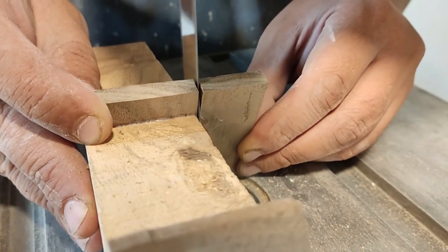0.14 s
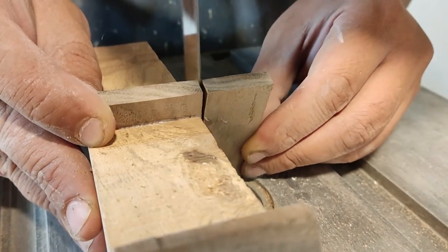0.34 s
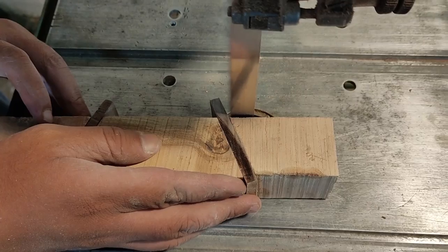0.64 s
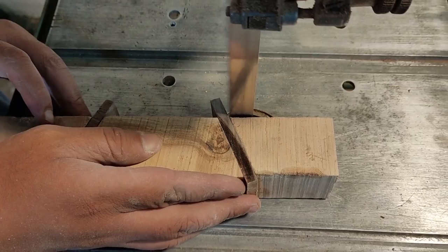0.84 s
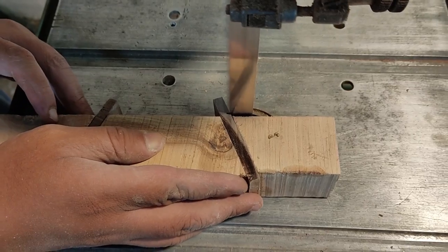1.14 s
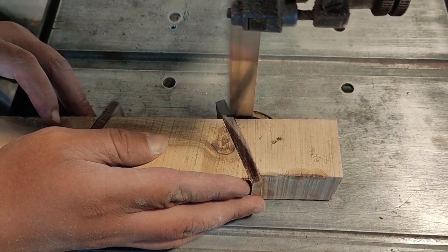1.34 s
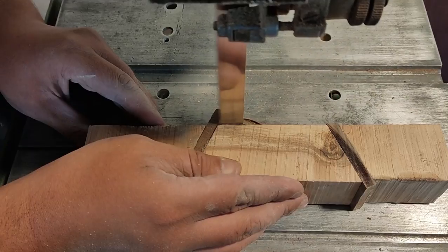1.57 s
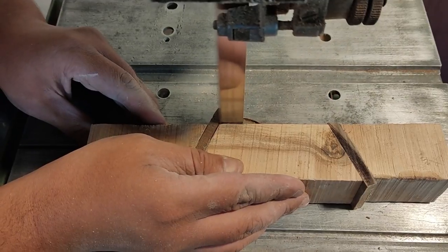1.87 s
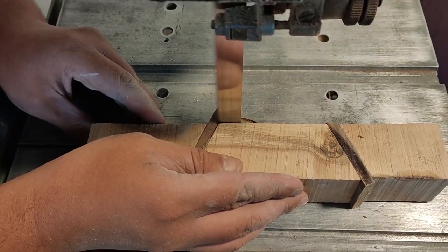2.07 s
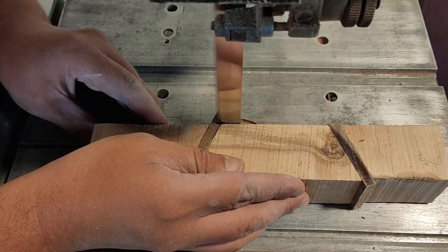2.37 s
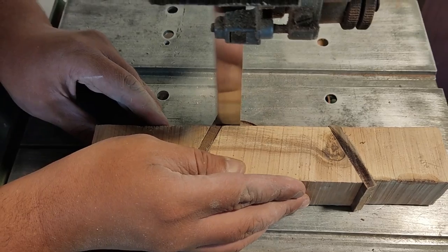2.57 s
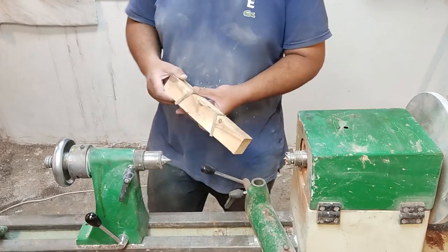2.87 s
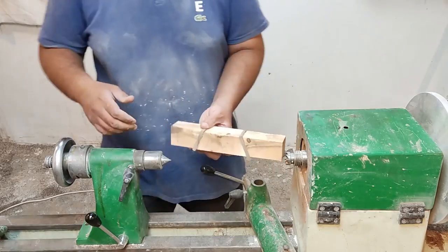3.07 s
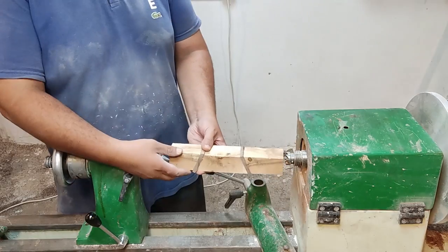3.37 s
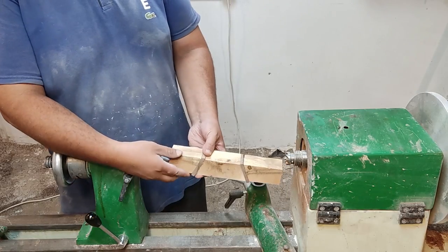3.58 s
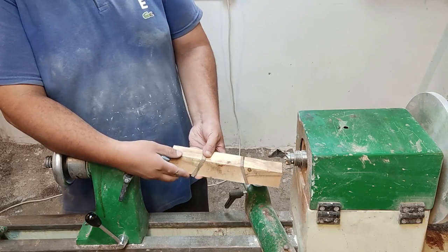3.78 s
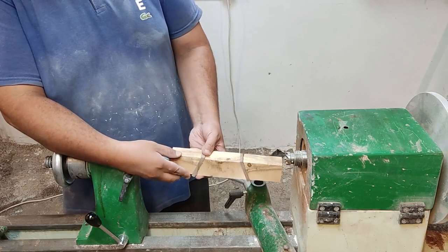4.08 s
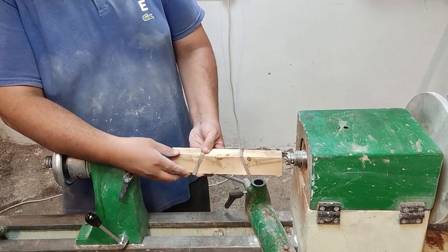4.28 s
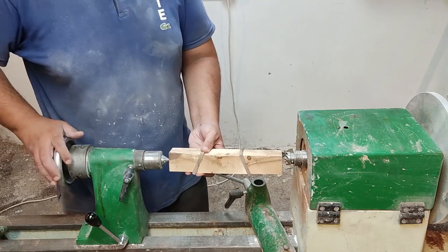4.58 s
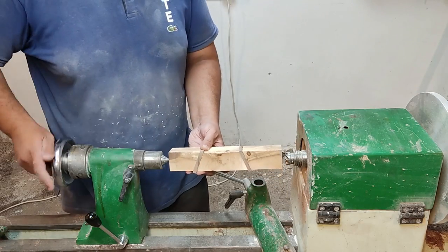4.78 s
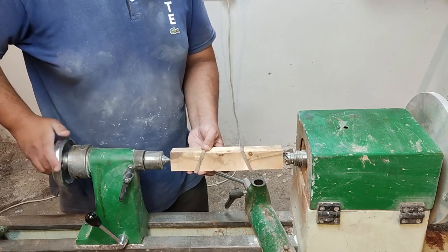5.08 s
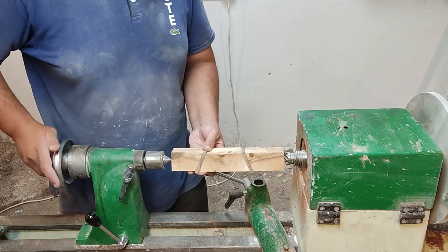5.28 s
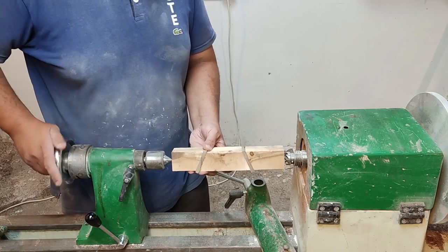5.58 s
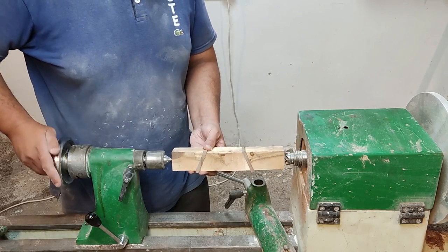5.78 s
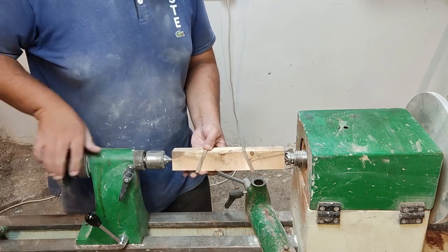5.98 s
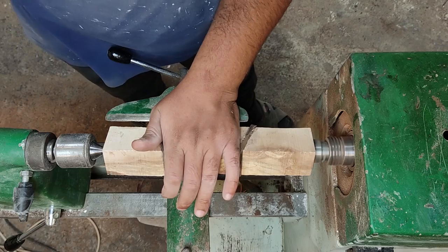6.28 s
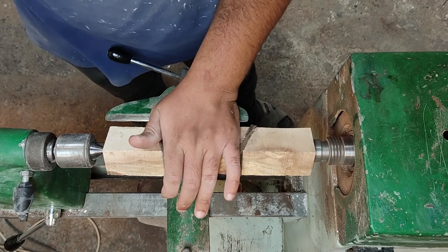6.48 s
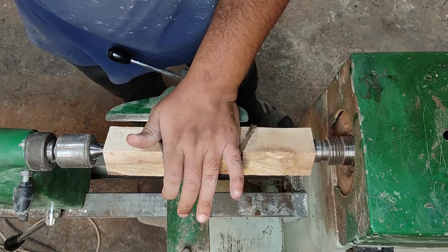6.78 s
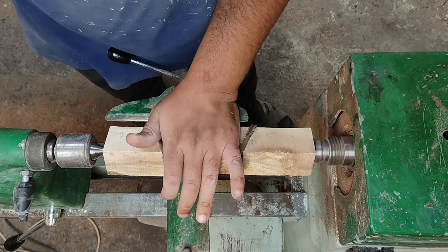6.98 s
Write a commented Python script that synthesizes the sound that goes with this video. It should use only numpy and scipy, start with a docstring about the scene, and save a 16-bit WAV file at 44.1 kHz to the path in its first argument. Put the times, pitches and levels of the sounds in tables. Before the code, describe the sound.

Harsh buzzing band saw cutting wood in three views, a sudden drop to low machine drone and handling knocks, finally a rumbling wood lathe.

```python
"""A band saw bites through wood, heard from three views in turn: a rough stack of tooth tones over motor hum.
Then comes a quiet shop with droning machines and hiss, where a hand brushes and knocks a wooden block.
Last a lathe runs close by, its bearings and belt droning while the cut swells twice.
Periodic forces are sums of wavering sines, friction is coloured noise, and struck bodies are resonators
driven by short bursts; sum and difference signals spread each source over two microphones."""
import sys
import numpy as np
from scipy import signal
from scipy.fft import rfft, irfft, next_fast_len
from scipy.io import wavfile
from scipy.ndimage import uniform_filter1d, map_coordinates

SR = 44100
rng = np.random.default_rng(int(sys.argv[2]) if len(sys.argv) > 2 else 0)


def store_pcm(level_fs):
    """Save levels as 16-bit WAV."""
    pcm = np.round(np.clip(level_fs, -1, 1) * 32767).astype(np.int16)
    wavfile.write(sys.argv[1], SR, np.atleast_2d(pcm).T)


N = 314433  # samples

# starts of the second saw view, third saw view, quiet shop and lathe: (time [s])
STARTS = [.647, 1.6, 2.679, 6.1598]
# saw layers: name: (level in view 1 [dB], in view 2 [dB], in view 3 [dB], response to the feed [dB per dB])
SAW_LAYERS = {"second order": (-62, -61, -61.5, 0.4), "third order": (-49, -64, -64.5, 1.3),
              "fourth order": (-68.5, -64, -58, .5), "frame": (-62, -54.5, -59.5, 0.26),
              "blade": (-65, -60.5, -61, -0.2), "sizzle": (-46, -63, -68, 1.3),
              "sawdust": (-46.5, -48, -47.5, 0.74), "ring": (-77, -69, -65.5, .5)}
# pressure of the wood on the blade: (time [s], level [dB])
FEED_PRESSURE = [(0, -1.5), (.14, 0.5), (.22, -3.5), (.31, -6), (.45, -1.5), (.62, -1), (.7, -1.5),
                 (1.0, -0.5), (1.55, 1.5), (1.95, 2), (2.4, -1), (2.62, 0)]


def amp(db):
    """Level to amplitude: 20 dB is a factor of ten."""
    return 10 ** (np.asarray(db) / 20)


def unit(x):
    """Normalization to an rms of 1, so that a later gain alone sets the level."""
    return x / np.sqrt(np.mean(x ** 2) + 1e-20)


def along(points, hz):
    """Interpolation of (frequency, value) points on a logarithmic frequency axis."""
    f, v = np.transpose(points)
    return np.interp(np.log(hz + 1), np.log(f + 1), v)


def curves(rows):
    """Linear interpolation in time: one curve for each column after the time."""
    s, *columns = np.transpose(rows)
    return [np.interp(np.arange(N) / SR, s, column) for column in columns]


def wobble(rate):
    """Slow random modulation: straight lines between normal random knots, rate of them a second."""
    knots = rng.standard_normal(int(N * rate / SR) + 4)
    return map_coordinates(knots, [np.arange(N) * rate / SR], order=1)


def bump(s, half):
    """Gaussian time window of height 1 around s, down to 1/e at half seconds away."""
    return np.exp(-((np.arange(N) / SR - s) / half) ** 2)


def between(start, end):
    """Time gate: 1 from start to end, with a linear 2 ms ramp across each edge."""
    t = np.arange(N) / SR
    return np.clip(np.minimum(t - start, end - t) * 500 + .5, 0, 1)


def by_view(values):
    """Stepwise setting: one value for each saw view, the last held to the end."""
    return np.asarray(values)[np.searchsorted(STARTS[:2], np.arange(N) / SR)]


def filtered(x, response):
    """Linear filtering: the spectrum is multiplied by a complex response of frequency."""
    m = next_fast_len(N + 8192)  # padding keeps tails from wrapping round
    return irfft(rfft(x, m) * response(np.fft.rfftfreq(m, 1 / SR)), m)[..., :N]


def ringing(modes):
    """Modal superposition: damped resonators (centre Hz, width Hz, dB) add with alternating sign."""
    def response(f):
        total = 0
        for k, (centre, width, db) in enumerate(modes):
            damping = 1j * f * width
            total = total + (-1) ** k * amp(db) * damping / (centre * centre - f * f + damping)
        return total
    return response


def colour(spectrum):
    """Spectral shaping: a zero-phase response through (Hz, dB) points."""
    return lambda hz: amp(along(spectrum, hz))


def noise(response, patchy_db):
    """Broadband friction: two independent noises with shared random gain patches, filtered, joint rms 1."""
    z = signal.stft(rng.standard_normal((2, N)), nperseg=512)[2]
    field = rng.standard_normal(z.shape[1:])
    field = uniform_filter1d(field, size=5, axis=0)  # patches span neighbouring frequencies
    field = uniform_filter1d(field, size=8, axis=1)  # and neighbouring moments
    patchy = signal.istft(z * amp(patchy_db * unit(field)), nperseg=512)[1][:, :N]
    return unit(filtered(patchy, response))


def tone(phase):
    """Quadrature pair: a sine of rms 1 and its quarter-turned twin."""
    return np.sqrt(2) * np.array([np.sin(phase), np.cos(phase)])


def hum(lines, waver_db, drift, rate):
    """Rotating machinery as partials (Hz, dB) whose level and phase (drift, radians) wander."""
    turn = 2 * np.pi * np.arange(N) / SR
    total = 0
    for hz, db in lines:
        gain = amp(db + waver_db * wobble(rate))
        phase = hz * turn + drift * wobble(rate) + 2 * np.pi * rng.random()
        total = total + gain * tone(phase)
    return total


def stereo(pair, alike, lean, lag_s=0):
    """Interchannel coherence: sum and difference of the pair set likeness, then balance and delay."""
    def mix(hz):
        angle = np.arccos(np.clip(along(alike, hz), -.8, 1)) / 2
        return np.array([1 + 0 * hz, np.tan(angle)])

    half = np.array([[.5], [-.5]])  # left and right share the offset equally

    def offset(hz):
        return amp(along(lean, hz) * half) * np.exp(-2j * np.pi * hz * lag_s * half)

    mid, side = filtered(pair, mix)
    return filtered(np.array([mid + side, mid - side]), offset)


def strokes():
    """Sliding friction follows hand speed: rub and dust gains swell, peak roundly and fade."""
    # strokes over wood: (peak time [s], rise [s], fall [s], rub level [dB], dust level [dB])
    stroke_rows = [(2.8, 0.055, .06, -61.5, -61), (3.018, 0.06, 0.074, -52.5, -54.5),
                   (3.325, 0.17, .1, -61, -61.5)]
    span_db = 20  # level change over one rise or fall time
    t = np.arange(N) / SR
    total = 0
    for s, rise, fall, rub_db, dust_db in stroke_rows:
        distance = (t - s) / np.where(t < s, rise, fall)
        total = total + amp([[rub_db], [dust_db]] - span_db * distance ** 2)
    return total


def puff(s, db, t60):
    """Exponential decay: a noise burst from s that falls 60 dB in t60, cut off after 0.25 s."""
    out, t = np.zeros((2, N)), np.arange(SR // 4) / SR
    out[:, round(s * SR):][:, :len(t)] = amp(db - 60 * t / t60) * rng.standard_normal((2, len(t)))
    return out


def contacts():
    """Impact excitation: knocks ring the block's modes; metal ticks ring broad, bright resonances."""
    # modes of the wooden block: (frequency [Hz], width [Hz], relative level [dB])
    block = [(760, 110, -3.5), (1200, 140, -1), (1440, 89, 2.5), (2540, 700, -18)]
    # knocks: (time [s], excitation level before the block [dB], 60 dB decay time of the excitation [s])
    knock_rows = [(3.2148, -43.5, 0.04), (3.224, -42.5, 0.036), (3.230, -42, 0.036), (3.236, -41, .03),
                  (3.247, -45.5, .04), (3.253, -49, 0.12), (4.853, -60, .2), (5.81, -65, 0.15)]
    # ticks: (time [s], excitation level [dB], centre frequency [Hz], 60 dB decay time of the excitation [s])
    tick_rows = [(4.836, -55, 9000, .02), (4.843, -53.5, 15000, .06), (4.853, -55.5, 3000, 0.096),
                 (5.81, -57.5, 3000, 0.11)]
    blows = sum(puff(*row) for row in knock_rows)
    for s, db, _ in knock_rows:
        blows[:, round(s * SR)] += amp(db + 14.5)  # one firm push leads each knock
    total = filtered(blows, lambda hz: amp(10) * ringing(block)(hz))
    for s, db, hz, t60 in tick_rows:
        total = total + filtered(puff(s, db, t60), ringing([(hz, 0.38 * hz, 0)]))
    return total


def shop():
    """Diffuse background: distant machines drone under microphone hiss while a hand works the block."""
    # broadband drone: (frequency [Hz], relative density [dB per Hz])
    drone_colour = [(15, -30), (25, 2.5), (67, -8), (117, -15.5), (156, -3), (200, -7), (344, -5),
                    (556, -14), (636, -9.5), (728, -17.5), (802, -16), (2500, -33), (3250, -55),
                    (5500, -120)]
    # tones of the distant machines: (frequency [Hz], relative level [dB])
    drone_tones = [(64.6, -73.5), (172.3, -71), (279.9, -71), (339.1, -71), (371.4, -71.5), (500.6, -75.5),
                   (624.5, -79), (780.6, -82), (1050, -83), (2370, -90.5)]
    # microphone hiss: (frequency [Hz], relative density [dB per Hz])
    hiss_colour = [(710, -27), (1200, -6.5), (2360, -7.5), (3330, -7), (6220, -10.5), (9570, -15),
                   (13500, -13.5), (14900, -9), (15700, -10.5)]
    # skin rubbing over wood: (frequency [Hz], relative density [dB per Hz])
    skin = [(410, -41), (700, -7), (762, -6), (1730, -9), (3200, -4.5), (4590, -7.5), (5250, -7),
            (6520, -10), (12500, -12), (16200, -41), (22000, -120)]
    # likeness of the two microphones: (frequency [Hz], left-right correlation [-1 to 1])
    shop_alike = [(60, 0.81), (150, 0.99), (380, 0.96), (950, 0.7), (2380, 0.36), (5980, 0.21),
                  (15000, 0.18)]
    drone_db, hiss_db = -60.5, -69
    left_lag_s = .00014  # the left microphone hears the shop this much later

    rub, fine = strokes()
    drone_noise = amp(-0.5) * noise(colour(drone_colour), patchy_db=0.5)
    drone = drone_noise + amp(-5) * unit(hum(drone_tones, waver_db=3.0, drift=0.95, rate=12))
    hiss = amp(hiss_db) * noise(colour(hiss_colour), patchy_db=1.0)
    dust = ringing([(14900, 3000, 0)])
    brush = rub * noise(colour(skin), patchy_db=2.0)
    brush = brush + fine * noise(lambda hz: dust(hz) ** 2, patchy_db=4.0)
    swell = amp(drone_db + .6 * wobble(3))
    room = stereo(swell * drone + hiss, shop_alike, [(500, 0.069)], left_lag_s)
    hand_alike = [(640, 0.67), (1400, .2), (12000, .05)]
    hand_lean = [(4400, -0.5), (9000, -0.5), (15000, -8.5)]
    return room + stereo(brush + contacts(), hand_alike, hand_lean)


def lathe():
    """Forced vibration: spindle tones and bed rumble, while the cut drives tones near 800 Hz and shavings."""
    # level of the cut: (time [s], level [dB])
    press = [(6.16, -38), (6.29, -42.5), (6.35, -47), (6.47, -50.5), (6.52, -41), (6.66, -36), (6.8, -39),
             (6.97, -49.5), (7.13, -42.5)]
    # headstock tones: (frequency [Hz], relative level [dB])
    headstock = [(155, -56.5), (170, -56.5), (195, -57.5), (322, -58), (340, -55), (364, -54), (379, -52),
                 (418, -55.5), (456, -56.5), (475, -58.5), (499.4, -53.5)]
    # tones driven by the cut: (frequency [Hz], relative level [dB])
    chatter = [(637, -52), (714.6, -52), (753, -47.5), (790.5, -47.5), (819.5, -41), (924.6, -51.5),
               (1039, -55.5), (1075, -67), (1110, -63), (1172, -79)]
    # bearing tones: (frequency [Hz], relative level [dB])
    bearing_tones = [(1292, -62), (1448, -62), (1658, -61), (1841, -63), (1992, -62), (2024, -62),
                     (2089, -64), (2126, -62), (2169, -62), (2207, -62), (2261, -67), (2353, -58),
                     (2552, -68), (2719, -72)]
    # rumble of the bed: (frequency [Hz], relative density [dB per Hz])
    bed_colour = [(12, -46), (20, -10), (102, -9.5), (173, -4), (248, -8.5), (368, 0.5), (492, -7),
                  (555, -13), (795, 3), (882, -13), (1060, -2.5), (1200, -18), (1560, -46), (2640, -120)]
    # noise of the shavings: (frequency [Hz], relative density [dB per Hz])
    shavings_colour = [(530, -24), (900, -1), (1360, -13.5), (1430, -6.5), (1740, -9), (2270, -9.5),
                       (3320, -21.5), (3900, -16.5), (4910, -24), (6480, -23), (7530, -28), (8640, -22),
                       (9590, -27.5), (11000, -22.5), (14200, -42)]
    # likeness of the two microphones: (frequency [Hz], left-right correlation [-1 to 1])
    lathe_alike = [(60, 0.76), (120, 1), (240, 0.89), (480, 0.58), (950, 0.097), (1890, 0.05), (3770, 0.11),
                   (7520, -0.029), (15000, -0.04)]
    # balance: (frequency [Hz], left minus right [dB])
    lathe_lean = [(60, -.5), (240, -0.5), (520, -1), (640, -1), (820, 5), (1100, -0.5), (1890, -1),
                  (3770, .1), (7520, -3.5), (14000, 13)]
    head_db, bed_db, scrape_db, whine_db = -46, -46, -45.5, -64.5
    bed_grows, scrape_grows, whine_grows = 0.24, .2, .15  # dB per dB of the cut
    whine_hz, top_hz = 4000, 14250

    cut_db, = curves(press)
    swing_db = cut_db - np.mean(press, axis=0)[1]
    head = amp(head_db) * unit(hum(headstock, waver_db=1.5, drift=0.43, rate=7))
    cut = amp(cut_db) * unit(hum(chatter, waver_db=1.2, drift=.25, rate=8))
    bed = amp(bed_db + bed_grows * swing_db) * noise(colour(bed_colour), patchy_db=0.0)
    bearing = amp(-4.0) * unit(hum(bearing_tones, waver_db=5, drift=1.14, rate=16))
    shavings = amp(0.69 * wobble(60)) * noise(colour(shavings_colour), patchy_db=1.5)
    turn = 2 * np.pi * whine_hz * np.arange(N) / SR
    whine_gain = amp(whine_db + whine_grows * swing_db + 4.1 * wobble(30))
    whine = whine_gain * tone(turn + 0.83 * wobble(50))  # a thin wavering note
    scrape = amp(scrape_db + scrape_grows * swing_db) * (bearing + shavings)
    both = stereo(whine + head + cut + bed + scrape, lathe_alike, lathe_lean)
    return filtered(both, lambda hz: hz < top_hz)


def saw_level(layer):
    """Additive gains in dB: a layer's level in each view, its response to the feed and its flares."""
    # moments when one layer sings out: (layer name, time [s], half length [s], rise [dB])
    flare_rows = [("second order", .14, .08, 7.6), ("second order", .62, 0.035, 8.7),
                  ("second order", 0.77, 0.04, 5), ("second order", 1.09, 0.11, 6.5),
                  ("second order", 1.42, 0.064, 8.6), ("second order", 1.535, 0.032, 16.6),
                  ("second order", 2.09, 0.1, 6.3), ("second order", 2.54, .05, 6.9),
                  ("third order", .51, 0.066, 6), ("third order", 0.8, 0.06, 6.8),
                  ("third order", 1.326, 0.12, 7), ("third order", 1.55, .05, 6.8),
                  ("third order", 1.66, 0.02, 10), ("third order", 2.54, .1, 4.8),
                  ("fourth order", 0.16, .07, 12.6), ("fourth order", 1.546, 0.081, 10.4),
                  ("frame", 0.314, 0.062, 9.2), ("frame", 0.72, 0.057, 4.7), ("frame", 1.48, 0.029, 5.4),
                  ("frame", 2.67, 0.016, 10.5), ("blade", 0.9, 0.1, 4.2), ("blade", 1.4, 0.027, 4.7),
                  ("blade", 2.25, 0.2, 3.2), ("sizzle", 1.25, .1, 6), ("sizzle", 1.55, .08, 4)]
    *view_db, follows = SAW_LAYERS[layer]
    flares = sum(db * bump(s, half) for name, s, half, db in flare_rows if name == layer)
    return by_view(view_db) + follows * curves(FEED_PRESSURE)[0] + flares


def saw_beat():
    """Periodic modulation: the turning wheel shakes the blade most at twice its turning rate."""
    wheel_hz = 16.2  # mean rate
    wheel = 2 * np.pi * np.cumsum(wheel_hz + .3 * wobble(4)) / SR
    return np.sin(2 * wheel) + 0.33 * np.sin(wheel + 0.15) + 0.28 * np.sin(3 * wheel + 1.0)


def saw_teeth(db, beat):
    """Harmonic series: passing teeth give multiples of their rate; uneven set blurs high orders most."""
    # mean passing rate in each saw view: (rate [teeth per second])
    tooth_rate = [1040, 1038, 1037.8]
    # depth of the wheel's pulse on the tooth tones in each saw view: (depth [dB])
    pulse_depth = [3.5, 3, 2.5]
    # orders with the same base level in every view: (multiple of the tooth rate, level before the feed [dB])
    steady_orders = [(1, -65), (5, -68), (7, -65.5), (8, -69.5), (10, -70), (11, -72)]
    phase = 2 * np.pi * np.cumsum(by_view(tooth_rate)) / SR + .12 * beat
    phase = phase + .17 * wobble(200) + .03 * wobble(900) + .2 * wobble(30)  # late and early teeth
    pulse_db = by_view(pulse_depth) * beat

    def order(k):
        return amp(pulse_db + 2.5 * wobble(70)) * tone(k * phase + .4 * wobble(110))

    teeth = amp(db["second order"]) * order(2)
    teeth += amp(db["third order"]) * order(3)
    teeth += amp(db["fourth order"]) * order(4)
    teeth += amp(0.54 * db["third order"] - 35) * order(6)  # the squeal drags its octave along
    steady = sum(amp(level) * order(k) for k, level in steady_orders)
    return teeth + amp(1.3 * curves(FEED_PRESSURE)[0]) * steady


def saw_body(db, beat):
    """Resonance and modulation: noise rings the frame and blade; a blade tone pulses with the wheel."""
    # resonances of the frame: (frequency [Hz], width [Hz], relative level [dB])
    frame_modes = [(845, 80, 2), (1010, 116, -3), (1184, 153, -3), (2514, 220, -4.5), (2670, 190, -6),
                   (3035, 81, 3), (3760, 470, -11.5), (4156, 80, -5)]
    # lower wheel-rate sideband of the blade tone, then the tone: (frequency [Hz], relative level [dB])
    blade_lines = [(1737, -5.5), (1768, -4.5)]
    # high narrow ring of the blade: (frequency [Hz], width [Hz], relative level [dB])
    high_ring = [(12400, 100, 0)]
    frame = amp(db["frame"]) * noise(ringing(frame_modes), patchy_db=3.5)
    blade = unit(amp(5.5 * beat) * hum(blade_lines, waver_db=2, drift=.5, rate=20))
    ring = amp(db["ring"]) * noise(lambda hz: ringing(high_ring)(hz) ** 2, patchy_db=3.0)
    return frame + amp(db["blade"]) * blade + ring


def saw_kerf(db):
    """Turbulent cutting noise: sawdust and a high sizzle, with narrow bands kept dark."""
    # cutting noise in the first view: (frequency [Hz], relative density [dB per Hz])
    near_colour = [(15, -56), (25, -19.5), (413, -31.5), (498, -19.5), (688, -19.5), (1000, -14),
                   (1770, -15), (1920, -20), (2080, -4), (2320, -20), (3120, -1), (3860, -16),
                   (12700, -15.5), (15700, -19.5)]
    # cutting noise in the later views: (frequency [Hz], relative density [dB per Hz])
    far_colour = [(15, -45), (25, -11), (179, -22.5), (391, -26), (498, -13.5), (688, -14), (1000, -6),
                  (1590, -10.5), (1770, -2), (2140, -6), (2320, -15), (3120, -3.5), (7790, -11.5),
                  (15700, -12.5)]
    # high sizzle: (frequency [Hz], relative density [dB per Hz])
    sizzle_colour = [(9000, -120), (10000, -37), (12300, -28), (12900, -8), (13600, -9), (14800, 0),
                     (15700, -5.5)]
    # dark bands: (centre [Hz], half width to 1/e of the dip in dB [Hz], gain [dB])
    dark_bands = [(1100, 40, -8), (2800, 80, -6), (3500, 200, -3), (5530, 150, -5), (6000, 200, -4),
                  (7800, 400, -5), (8900, 400, -3), (10750, 300, -5), (12000, 250, -5), (12900, 280, -10),
                  (14200, 220, -5)]
    near = between(-1, STARTS[0])
    kerf = near * noise(colour(near_colour), patchy_db=1.5)
    kerf = kerf + (1 - near) * noise(colour(far_colour), patchy_db=1.5)
    flicker_db = 2.5 * wobble(45) + 1.5 * wobble(1500)
    sizzle = amp(db["sizzle"] + flicker_db) * noise(colour(sizzle_colour), patchy_db=0.7)

    def hollow(hz):
        return amp(sum(level * np.exp(-((hz - c) / w) ** 2) for c, w, level in dark_bands))

    return filtered(amp(db["sawdust"]) * kerf + sizzle, hollow)


def saw():
    """Amplitude modulation: wheel-shaken cutting sounds stand over a steadier motor hum."""
    # motor tones: (frequency [Hz], level before stereo [dB rms])
    motor_tones = [(100, -83.5), (185, -82.5), (265, -85.5), (499.3, -69), (560, -77.5), (602, -75.5),
                   (998.8, -66), (1497, -77), (2497, -69.5)]
    # likeness of the two microphones: (frequency [Hz], left-right correlation [-1 to 1])
    saw_alike = [(60, 0.66), (150, 0.84), (380, 0.9), (950, 0.97), (2380, 0.99), (5980, 0.39),
                 (15000, 0.01)]
    # balance: (frequency [Hz], left minus right [dB])
    saw_lean = [(60, -1.0), (180, 0.5), (550, 0.42), (1650, -0.39), (4970, 1.0), (15000, -0.28)]
    # brief dips of the cutting sounds as the second and third views begin: (gain [dB])
    join_dips = [-7.5, -2.5]
    join_s = 0.015  # half length of a dip

    db = {layer: saw_level(layer) for layer in SAW_LAYERS}
    beat = saw_beat()
    teeth = saw_teeth(db, beat)
    jolts = amp(1.02 * beat + 0.6 * wobble(39.64))
    cutting = teeth + jolts * (saw_body(db, beat) + saw_kerf(db))
    motor = hum(motor_tones, waver_db=0.8, drift=0.39, rate=7.23)
    joins = amp(sum(dip * bump(s + join_s / 2, join_s) for s, dip in zip(STARTS, join_dips)))
    return stereo(joins * cutting + motor, saw_alike, saw_lean)


def scene():
    """Succession in time: saw, shop and lathe follow one another with 2 ms crossings."""
    total = between(-1, STARTS[2]) * saw()
    total = total + between(STARTS[2], STARTS[3]) * shop()
    return total + between(STARTS[3], 9) * lathe()


def record(dry):
    """Band limitation: an ideal low-pass keeps only what lies below 15720 Hz."""
    return filtered(dry, lambda hz: hz < 15720)


dry = scene()
out = record(dry)
store_pcm(out)
```